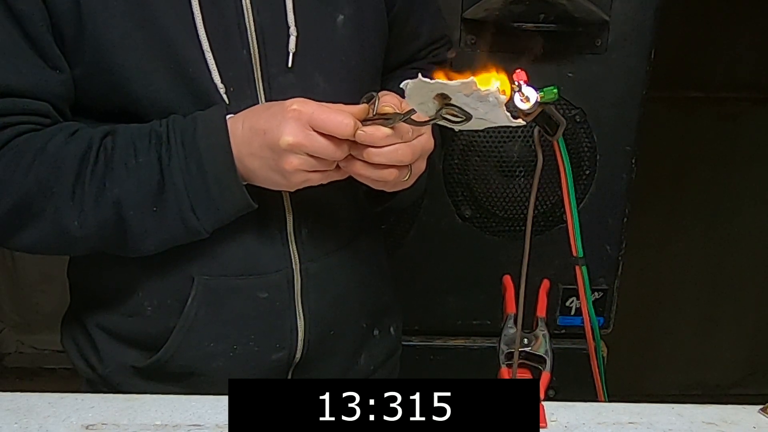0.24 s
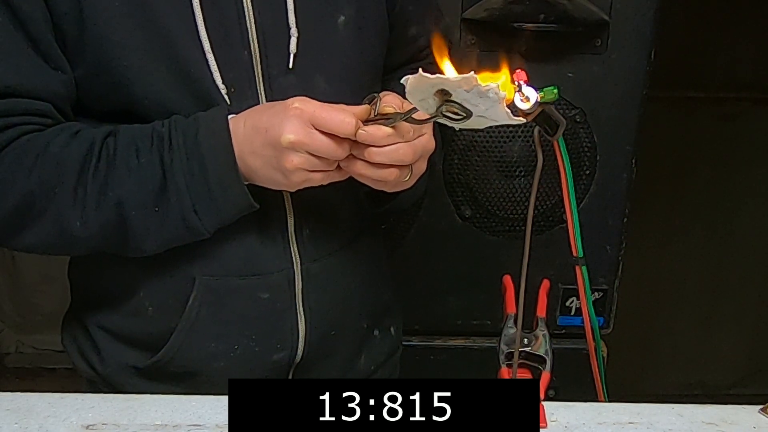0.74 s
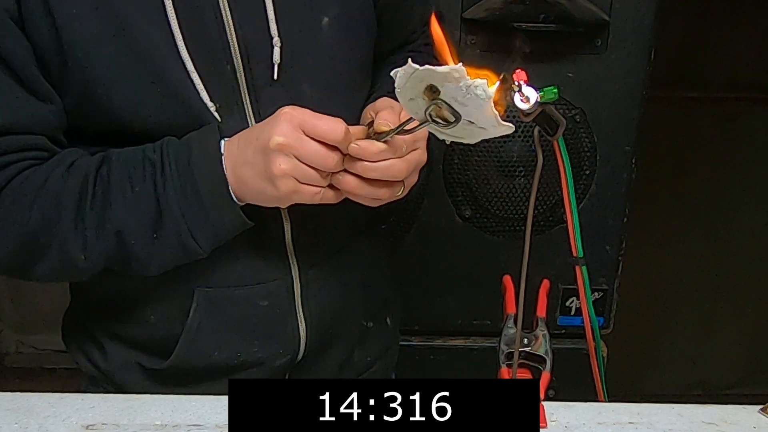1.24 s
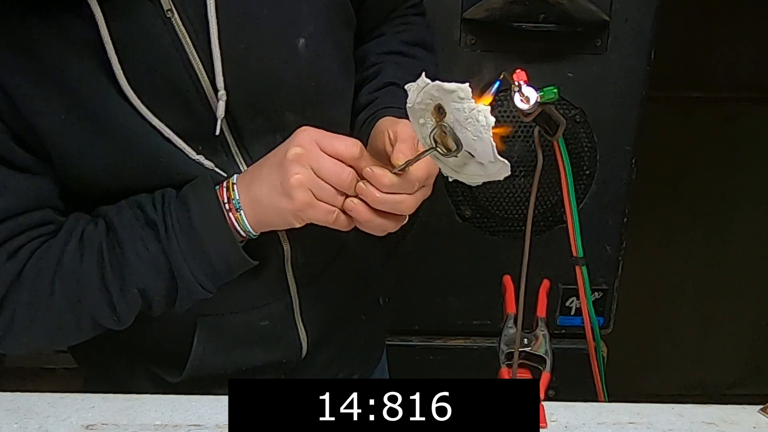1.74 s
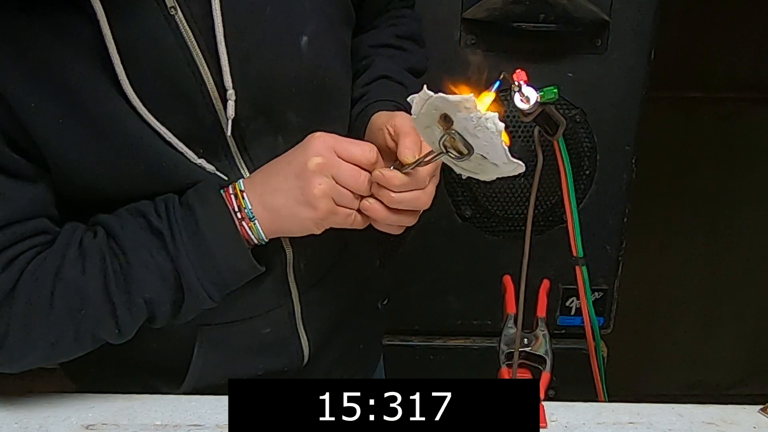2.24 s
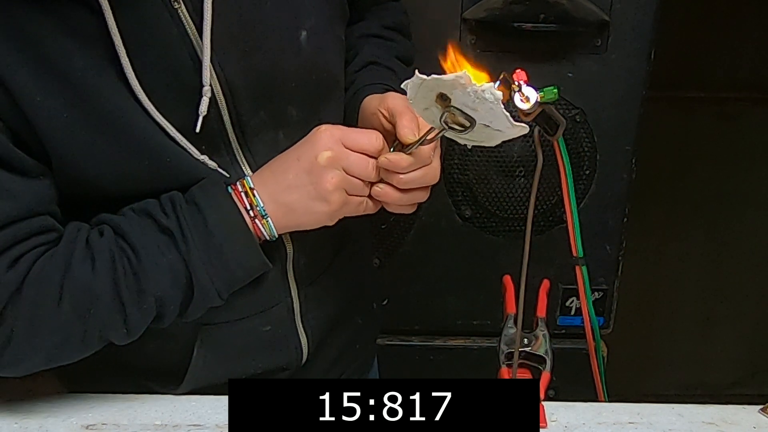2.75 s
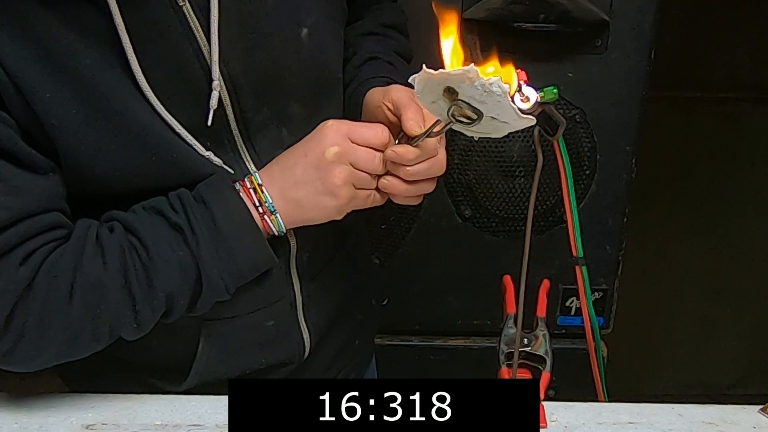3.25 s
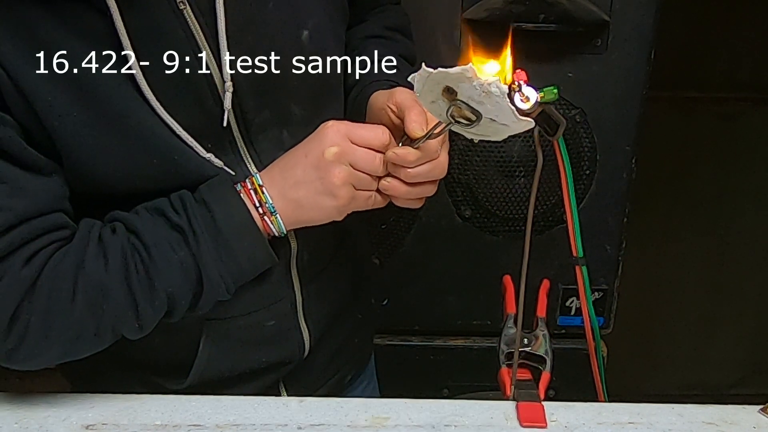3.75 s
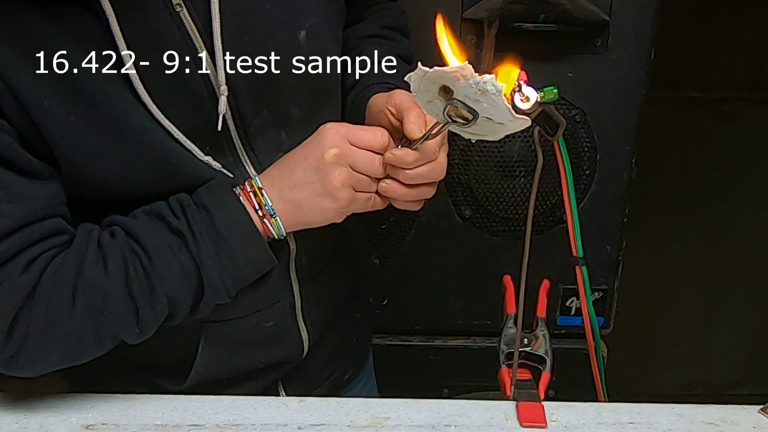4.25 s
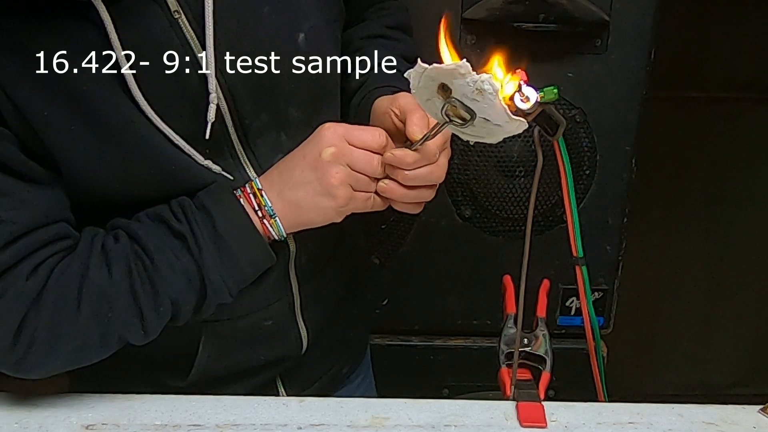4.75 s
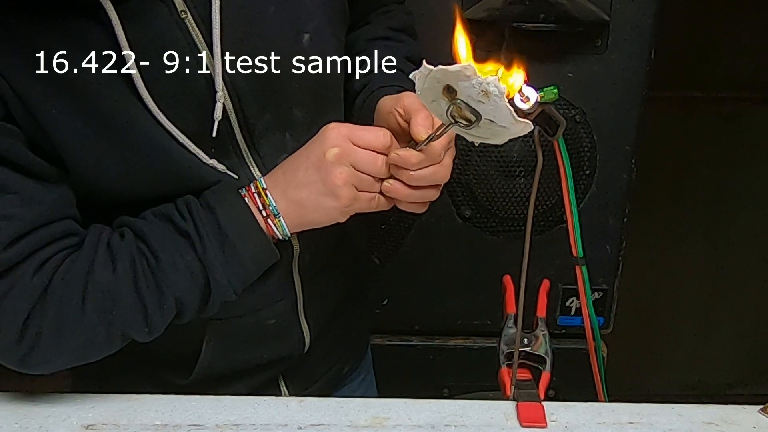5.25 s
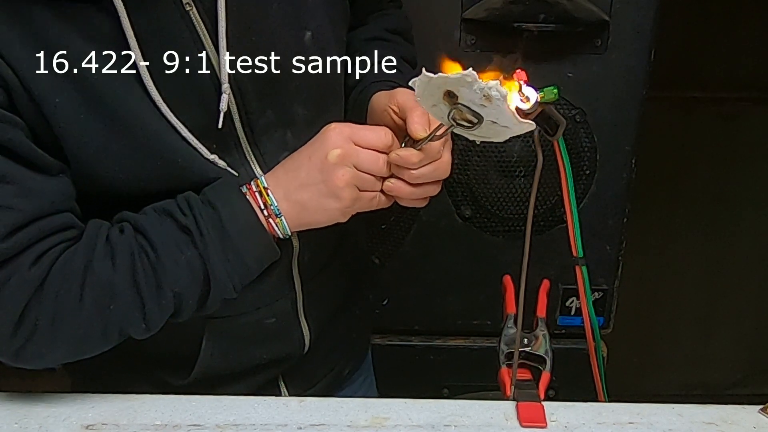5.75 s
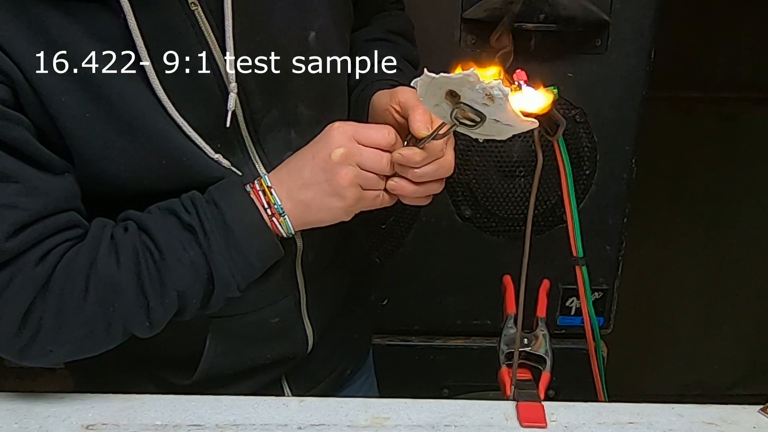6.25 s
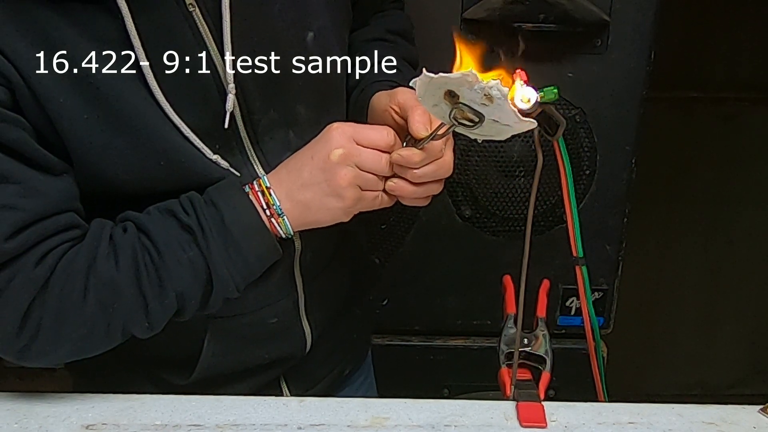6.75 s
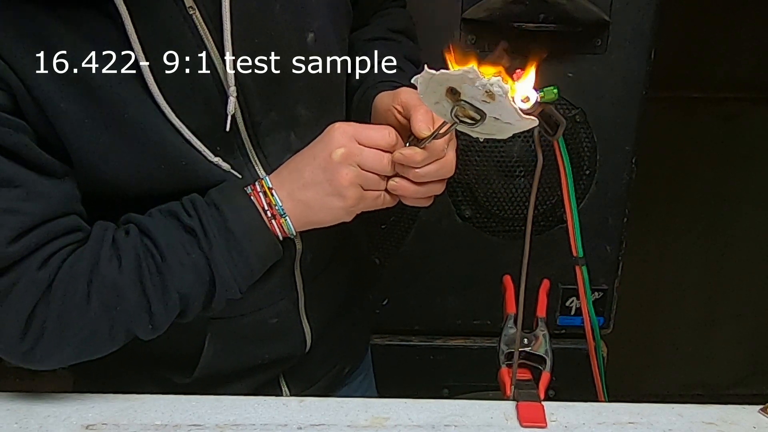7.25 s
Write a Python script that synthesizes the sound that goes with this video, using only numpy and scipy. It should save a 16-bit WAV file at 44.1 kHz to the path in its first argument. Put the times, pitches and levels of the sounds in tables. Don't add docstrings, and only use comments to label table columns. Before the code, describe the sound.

Close at an indoor workbench, a small gas torch rushes softly while its compressor pump and fan hum in a low, buzzing, many-toned drone. About halfway a valve knocks lightly and vents a hissing puff as the pump speeds up very slightly. A second later a soft, dull thump shakes the bench with a weaker puff, and a faint leak remains. Heard by a nearby camera in stereo.

```python
import sys
import numpy as np
from scipy import signal
from scipy.fft import rfft, irfft
from scipy.io import wavfile
from scipy.ndimage import uniform_filter1d, map_coordinates

SR = 44100
rng = np.random.default_rng(int(sys.argv[2]) if len(sys.argv) > 2 else 0)


def boost_factor(decibels):
    exponent = np.asarray(decibels, float) / 20
    return 10 ** exponent


def to_wav(sig):
    pcm = np.clip(np.atleast_2d(sig), -1, 1) * 32767
    pcm = np.round(pcm).astype(np.int16)
    wavfile.write(sys.argv[1], SR, pcm.T)


N = 330742

REFILL_S = 5.2


def along(points, hz):
    f, v = np.transpose(points)
    return np.interp(np.log(hz + 1), np.log(f + 1), v)


def curve(rows):
    s, v = np.transpose(rows)
    return np.interp(np.arange(N) / SR, s, v)


def wobble(rate, hop=1):
    knots = rng.standard_normal(int(N * rate / SR) + 4)
    return map_coordinates(knots, [np.arange(N)[::hop] * rate / SR], order=1)


def coloured(x, gain):
    return irfft(rfft(x) * gain(np.fft.rfftfreq(N, 1 / SR)), N) / np.sqrt(2 / SR)


def ports(mid, side):
    return np.array([mid + side, mid - side])


def orders(count=47):
    # multiple, loaded/dB, vented/dB, side under mid/dB
    stroke = [(1, -59, -62, -17), (2, -37, -38, -16.5), (3, -61, -58, -12), (4, -38, -41, -35),
              (5, -53, -57, -27), (6, -54, -51, -28), (7, -59, -61, -24), (8, -60, -55, -25),
              (9, -47.2, -50.6, -25), (11, -64, -66, -22), (12, -69, -63, -13), (13, -58, -61, -26),
              (14, -62, -69, -17), (15, -51, -59, -16), (16, -72, -70, -6), (17, -59, -61, -9),
              (18, -67, -78, -10), (19, -72, -70, 2), (20, -71, -63, -14), (21, -69, -65, -11),
              (22, -69, -76, -12), (23, -72, -76, -7), (24, -70, -83, -8), (27, -69, -77, -6)]
    # multiple, loaded mid/dB, loaded side/dB, vented mid/dB, vented side/dB
    lifted = [(31, -83, -86, -71, -82), (32, -71, -71, -72, -74), (33, -77, -81, -70, -80),
              (34, -69, -67, -66, -73), (35, -61, -70, -68, -70), (36, -58, -59, -64, -58),
              (37, -61, -63, -60, -59), (38, -60, -66, -63, -70), (39, -70, -76, -69, -71),
              (40, -72, -71, -65, -76), (42, -72, -79, -75, -61), (43, -70, -65, -67, -57),
              (44, -74, -72, -72, -74)]
    tenth_db, fall_db, scatter_db, faint_side_db = -74, .2, 3, -4
    multiple = np.arange(count + 1)[:, None]
    faint = tenth_db - fall_db * (multiple - 10) + scatter_db * rng.standard_normal((count + 1, 2))
    rows = {}
    for k, (loaded, free) in enumerate(faint):
        rows[k] = (loaded, loaded + faint_side_db, free, free + faint_side_db)
    for k, loaded, free, side_db in stroke:
        rows[k] = (loaded, loaded + side_db, free, free + side_db)
    for k, *levels in lifted:
        rows[k] = levels
    return [(k, *rows[k]) for k in range(1, count + 1)]


def plates(angle, load, speed, drift_db=3.8, side_db=-6, lag=2.6):
    # f/Hz, width/Hz, loaded/dB, vented/dB
    resonances = [(1409, 29, -79, -73), (1586, 64, -83, -80), (1806, 160, -78.5, -80.5),
                  (2233, 120, -78, -81.5), (2604, 46, -80.5, -80.5), (2750, 140, -85, -91),
                  (2810, 29, -73, -84), (2901, 36, -79, -68.5), (2988, 94, -76, -68), (3075, 220, -82, -81),
                  (3540, 210, -83, -83)]
    hop = 64
    sag_hz = 28 * np.maximum(np.arange(N)[::hop] / SR - REFILL_S, 0)
    load, speed = load[::hop], speed[::hop]
    out = np.zeros(N, complex)
    step = np.exp(1j * angle)
    turn = step ** 48
    for k in range(48, 128):
        hz = k * speed + sag_hz
        size = 0
        for centre, width, db, free_db in resonances:
            size = size + boost_factor(free_db + load * (db - free_db)) / (1 + (2 * (hz - centre) / width) ** 2)
        phase = 2 * np.pi * rng.random() + 1.0 * wobble(2.5, hop) + 0.44 * wobble(9, hop)
        slow = size * boost_factor(drift_db * wobble(1.038, hop)) * np.exp(1j * phase)
        out += np.repeat(slow, hop)[:N] * turn
        turn = turn * step
    late = (out * np.exp(-1j * lag)).real
    return np.sqrt(2) * ports(out.real, boost_factor(side_db) * late)


def pump(wander_db=0.64, lag=2.8, low_lag=1.4):
    # t/s, turns per second
    shaft = [
        (0, 28.676),
        (3.65, 28.581),
        (3.75, 28.914),
        (4.5, 28.966),
        (5.52, 28.926),
        (6.41, 28.866),
        (7.5, 28.818),
    ]
    # multiple, loaded/dB per s, vented/dB per s
    drifting = [(4, .3, .4), (6, -.6, 0), (8, -2.2, 0), (9, -.6, 0), (13, .4, 1.2), (15, .3, 3),
                (17, .4, .4), (20, -.5, 1.5), (35, 0, -3.5), (36, 1.5, -2.5), (37, -3, 1.5), (38, .3, -2),
                (40, 3.5, .5), (43, .5, 3), (44, 0, 4)]
    # loaded t/s, vented t/s
    middle = (1.9, 6.25)
    valve_s, unload_s = 3.71, .08
    speed = curve(shaft)
    angle = 2 * np.pi * np.cumsum(speed) / SR
    t = np.arange(N) / SR
    load = np.clip(1 - (t - valve_s) / unload_s, 0, 1)
    drift = {}
    for k, loaded, free in drifting:
        vented_drift = free * (np.maximum(t, REFILL_S) - middle[1])
        drift[k] = load * loaded * (t - middle[0]) + (1 - load) * vented_drift
    mid, side = np.zeros(N), np.zeros(N)
    for k, mid_db, side_db, free_mid_db, free_side_db in orders():
        phase = k * angle + .1 - 1.775 * k + .2875 * k * k - .17 * max(k - 33, 0) ** 2
        phase += np.pi * ((k > 36) + (k == 36) * 1.22 * load)
        phase += .007 * max(k - 10, 0) * wobble(2)
        behind = lag + .02 * k * rng.standard_normal() if k > 3 else low_lag
        size = np.sqrt(2) * boost_factor(drift.get(k, 0) + wander_db * np.sqrt(k / 20) * wobble(1.29))
        mid += size * boost_factor(free_mid_db + load * (mid_db - free_mid_db)) * np.cos(phase)
        side += size * boost_factor(free_side_db + load * (side_db - free_side_db)) * np.cos(phase - behind)
    return ports(mid, side) + plates(angle, load, speed)


def tones(lag=2.35):
    # f/Hz, mid/dB, side/dB, unsteadiness/dB, start angle/rad
    hums = [(59.9, -57, -76, .4, 1.2), (119.9, -63, -80, .5, 0), (239.84, -59, -82, .6, 1.8),
            (258.08, -57.5, -78, .1, 3.3), (671, -56, -65, 1, 0)]
    # t/s, spread/s, delay/s
    fan_slip = (3.95, .8, .00095)
    t = np.arange(N) / SR
    slip = fan_slip[2] * np.exp(-((t - fan_slip[0]) / fan_slip[1]) ** 2)
    out = np.zeros((2, N))
    for hz, mid_db, side_db, unsteady_db, start in hums:
        slipped = t - slip * (hz > 250)
        phase = 2 * np.pi * hz * slipped + start + .5 * unsteady_db * wobble(2)
        pair = ports(boost_factor(mid_db) * np.cos(phase), boost_factor(side_db) * np.cos(phase - lag))
        out += np.sqrt(2) * boost_factor(unsteady_db * wobble(3.1)) * pair
    return out


def patchy_noise(patchy_db):
    z = signal.stft(rng.standard_normal((2, N + 512)), nperseg=512)[2]
    field = uniform_filter1d(rng.standard_normal(z.shape[1:]), size=6, axis=0)
    field = uniform_filter1d(field, size=14, axis=1)
    return signal.istft(z * boost_factor(patchy_db * field / field.std()), nperseg=512)[1][:, :N]


def rush(patchy_db=1.06, ripple_db=2):
    # f/Hz, level/dB per Hz
    alike_db = [(20, -95), (50, -80), (90, -75.5), (200, -81), (320, -88), (560, -91), (860, -101),
                (1450, -105), (2400, -105), (4300, -113), (5300, -116), (10500, -119), (12500, -119),
                (15500, -138)]
    # f/Hz, level/dB per Hz
    unlike_db = [(20, -99), (55, -76), (120, -88), (250, -95.5), (600, -93.5), (900, -100), (1480, -102),
                 (2400, -104), (4300, -113), (5300, -111), (10500, -116), (12500, -118), (15500, -136)]
    # f/Hz, width/Hz, mid over the rush/dB, side over the rush/dB
    casing = [(153.6, 11, 6.5, -7), (259, 16, 6.5, -13), (422.4, 29, 13.5, 3), (674, 52, 8, 1),
              (781, 17, 16.5, 0), (1056, 102, 19.5, 17), (1226, 68, 14.5, 15), (1750, 320, 11, 5),
              (2003, 18, 15.5, -1), (2270, 74, -12, -4), (3000, 226, 19.5, 16.5), (3250, 117, 18.5, 11),
              (3780, 340, 9.5, -6), (6580, 105, 10.5, 15), (7340, 66, 16.5, 2), (7530, 50, 3, -5),
              (7620, 990, 14, 13), (9100, 460, 5.5, -6)]
    # f/Hz, correlation
    likeness = [(60, 0.24), (300, 0.99), (1000, -1.25), (3000, -0.072), (8000, -0.72), (14000, -.4)]
    # f/Hz, correlation
    late = [(1000, 0), (2000, .45), (5000, 0.45), (8000, .1), (13000, .45)]
    a, b = patchy_noise(patchy_db)
    comb = rng.standard_normal(500)

    def humps(hz, col):
        ripple = np.interp(hz, np.linspace(0, SR / 2, len(comb)), comb)
        room = boost_factor(ripple_db * ripple * (hz > 1300))
        power = 1
        for row in casing:
            power = power + boost_factor(2 * row[col]) / (1 + (2 * (hz - row[0]) / row[1]) ** 2)
        return room * np.sqrt(power)

    def lean(hz):
        return np.clip(along(likeness, hz), -.8, .8) - 1j * along(late, hz)

    def alike(hz):
        return boost_factor(along(alike_db, hz)) * humps(hz, col=2)

    def unlike(hz):
        return boost_factor(along(unlike_db, hz)) * humps(hz, col=3)

    mid = coloured(a, alike)
    side = coloured(a, lambda hz: unlike(hz) * lean(hz))
    side += coloured(b, lambda hz: unlike(hz) * np.sqrt(np.abs(1 - np.abs(lean(hz)) ** 2)))
    return ports(mid, side)


def vent():
    # f/Hz, level/dB per Hz
    vented = [(300, -30), (900, 2), (2000, -1), (3000, 6), (4500, -11.5), (6500, -10), (9000, -18),
              (15000, -48)]
    # t/s, peak/dB, fade/dB per s
    puffs = [
        (3.7, -55, 13),
        (4.885, -60.5, 11),
    ]
    rise_s, leak_db = 0.024, -69
    a, b = (coloured(v, lambda hz: boost_factor(along(vented, hz))) for v in rng.standard_normal((2, N)))
    t = np.arange(N) / SR
    flow = np.zeros(N)
    for s, db, fade_db in puffs:
        opening = np.clip((t - s) / rise_s, 0, 1) ** 2
        flow += opening * boost_factor(2 * (db - fade_db * np.abs(t - s)))
    flow += opening * boost_factor(2 * leak_db)
    return np.sqrt(flow) / a.std() * ports(a, .5 * b - 0.26 * a)


def bumps():
    # t/s, peak/dB, brightness/dB, rise/s
    blows = [
        (4.894, -39.5, 14, 0.0027),
        (4.8987, -24.5, -14, 0.0026),
        (4.9131, -19.5, -9.5, 0.0039),
        (4.9304, -27, -16, 0.0037),
        (4.954, -38, -8, 0.0057),
        (3.7301, -29.5, -2, 0.01),
    ]
    # f/Hz, level/dB, t60/s
    bench = [(64, -6, 0.083), (99.7, 5.5, 0.16), (151, -23, 0.074), (271, -17.5, 0.09), (377, -8, 0.085),
             (520, -13.5, 0.074), (686, -3.5, 0.05), (773, -15.5, 0.086), (934, -13.5, 0.088),
             (1140, -24, 0.13), (1665, -25, 0.16)]
    # f/Hz, level/dB per Hz
    rub_colour = [(100, -1), (300, -4), (1000, -5), (2000, -8.5), (2600, -23), (6000, -31), (9000, -37),
                  (15000, -71)]
    out = np.zeros((2, N + SR))
    t = np.arange(SR // 2) / SR
    a, b = (coloured(v, lambda hz: boost_factor(along(rub_colour, hz))) for v in rng.standard_normal((2, N)))
    rub = np.pad(ports(a, .5 * b - 0.22 * a) / a.std(), ((0, 0), (0, SR)))
    for s, db, bright_db, rise in blows:
        at = slice(round(s * SR), round(s * SR) + len(t))
        ring = np.zeros(len(t))
        for hz, level, t60 in bench:
            ring += boost_factor(level + bright_db * (hz > 320) - 60 * t / t60) * np.sin(2 * np.pi * hz * t)
        treble = ring - uniform_filter1d(ring, size=60)
        scuff = boost_factor(bright_db - 21.5 - 60 * t / 0.22) * rub[:, at]
        out[:, at] += boost_factor(db) * (1 - np.exp(-t / rise)) * (ports(ring, -.4 * treble) + scuff)
    return out[:, :N]


def scene():
    return pump() + tones() + rush() + vent() + bumps()


def band_limit(x):
    return signal.sosfilt(signal.butter(12, 15300, fs=SR, output="sos"), x)


def record(dry):
    return band_limit(dry)


dry = scene()
out = record(dry)
to_wav(out)
```